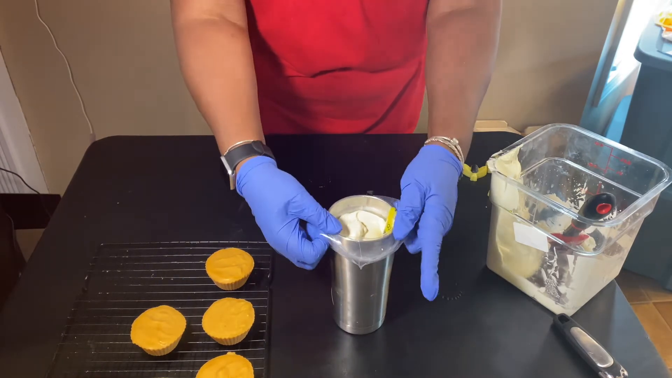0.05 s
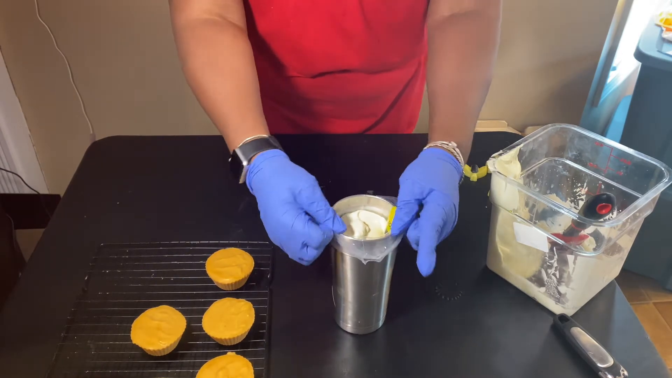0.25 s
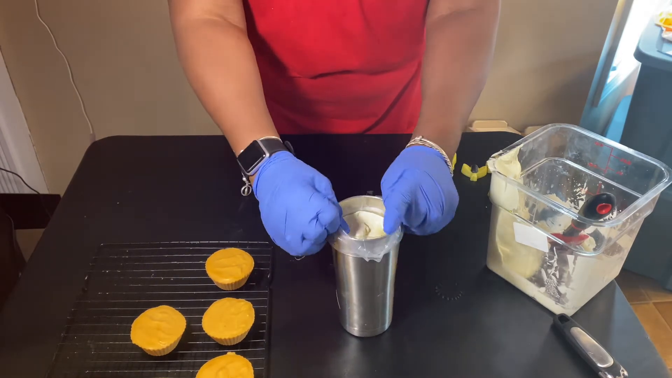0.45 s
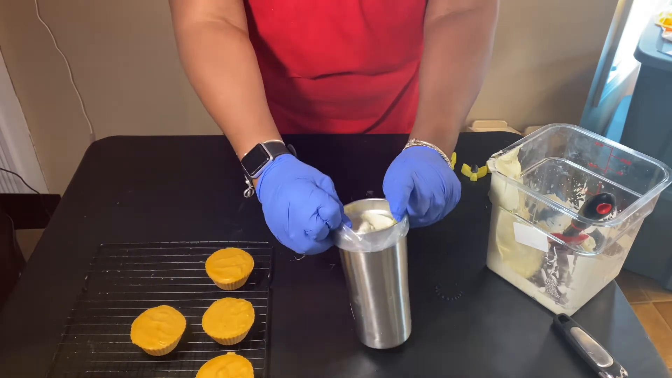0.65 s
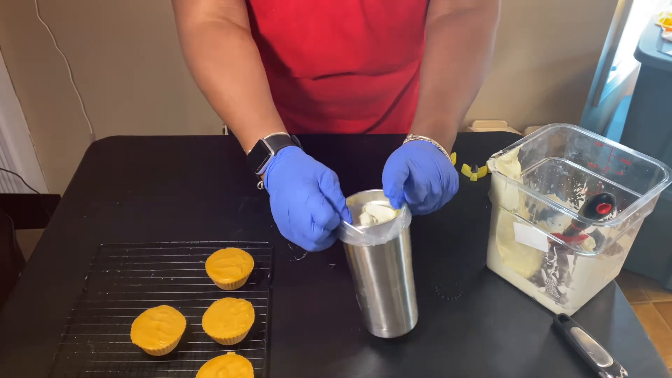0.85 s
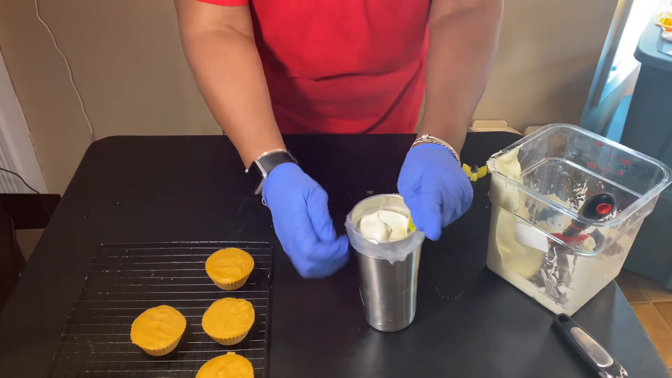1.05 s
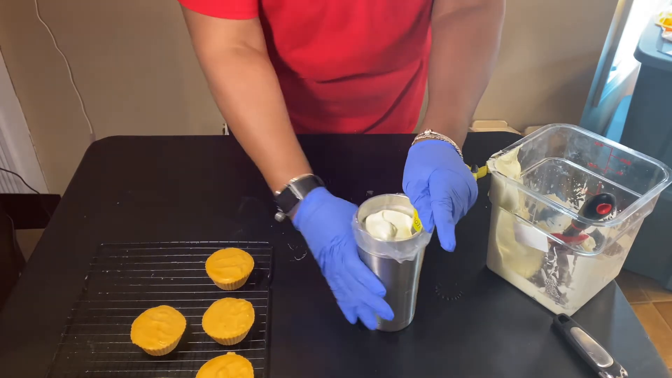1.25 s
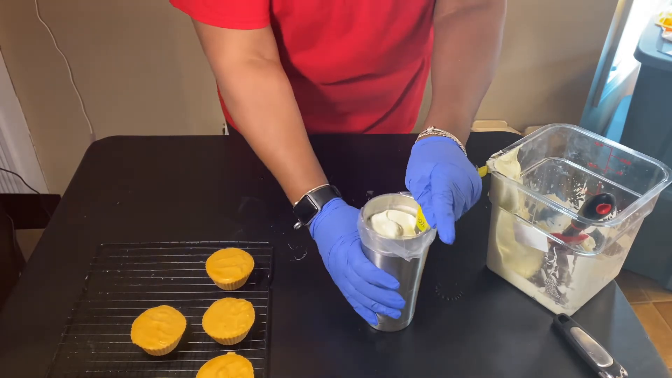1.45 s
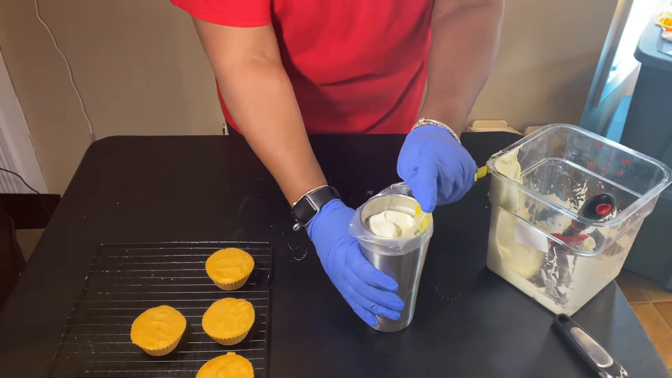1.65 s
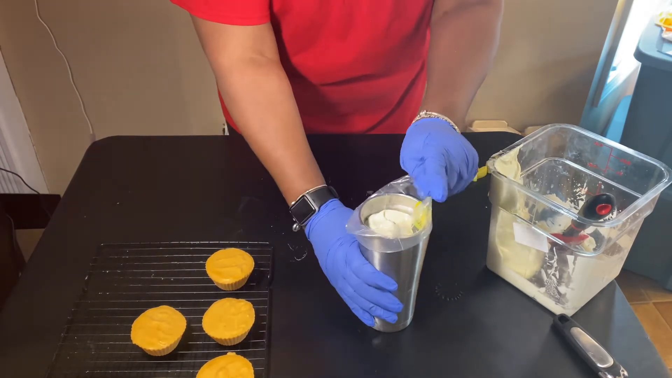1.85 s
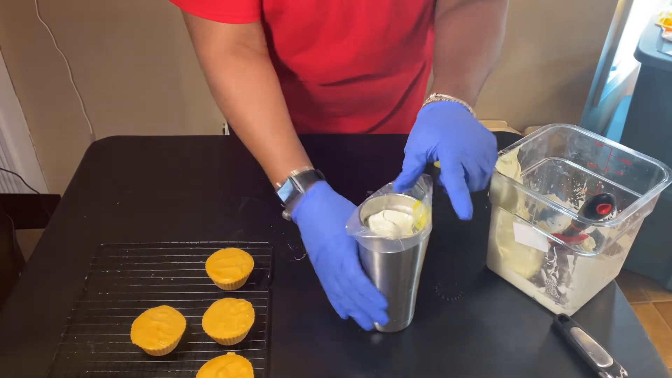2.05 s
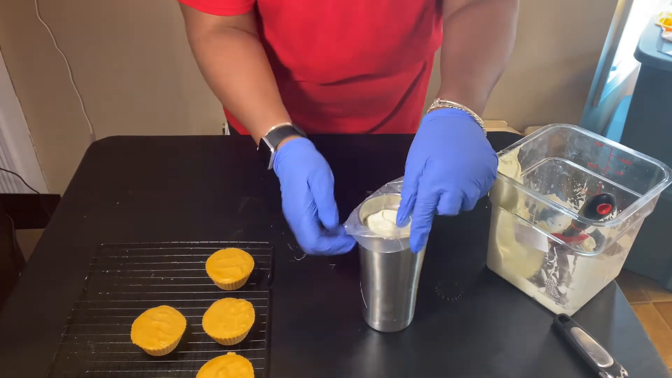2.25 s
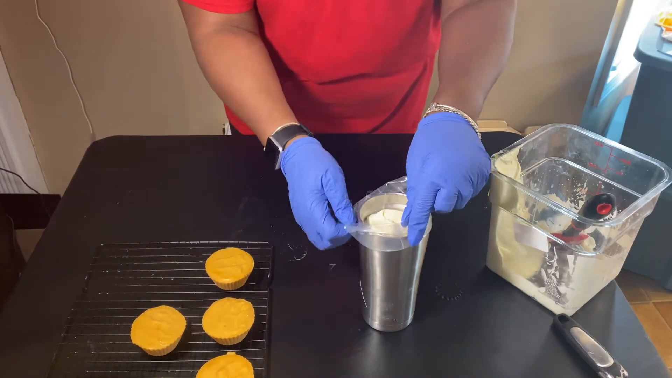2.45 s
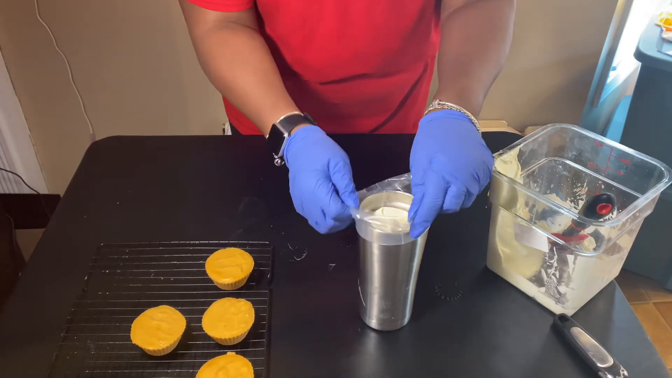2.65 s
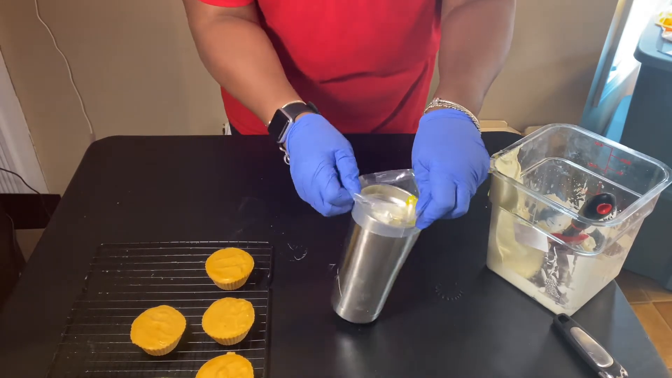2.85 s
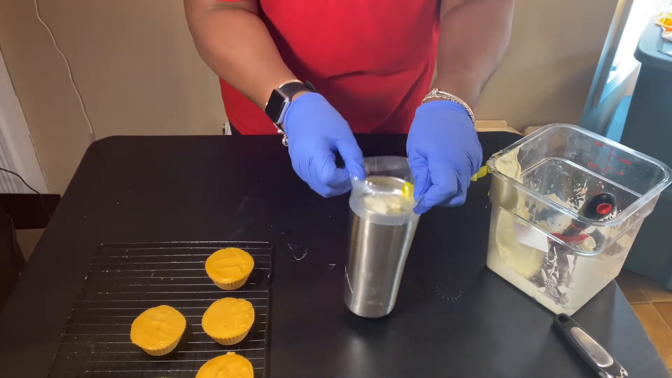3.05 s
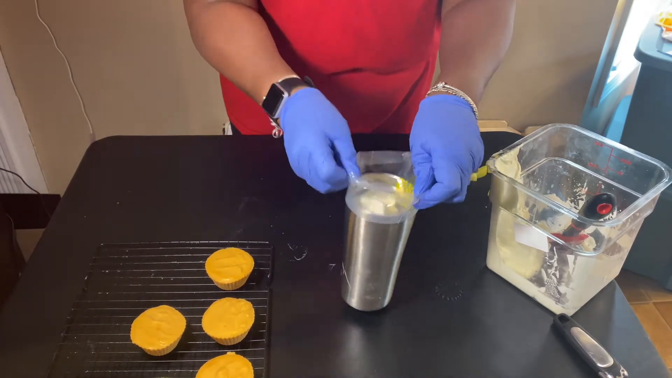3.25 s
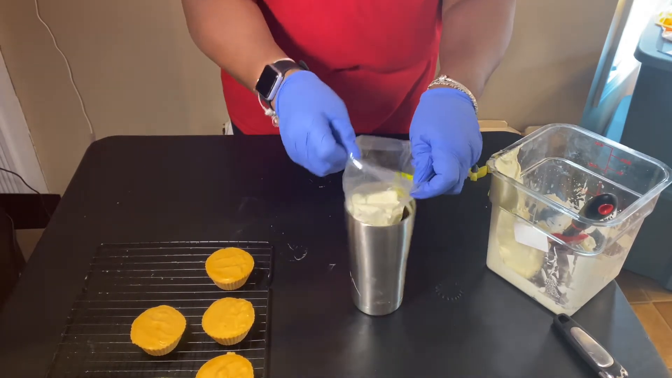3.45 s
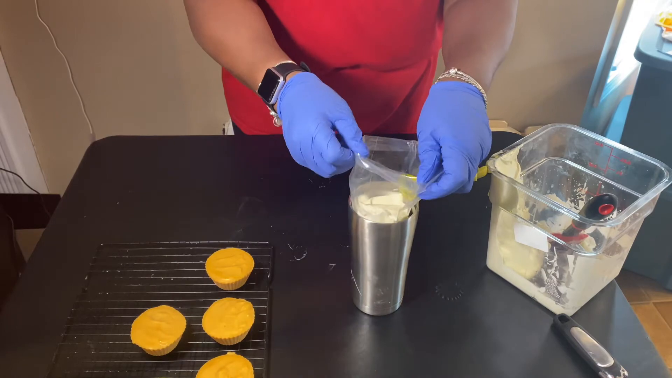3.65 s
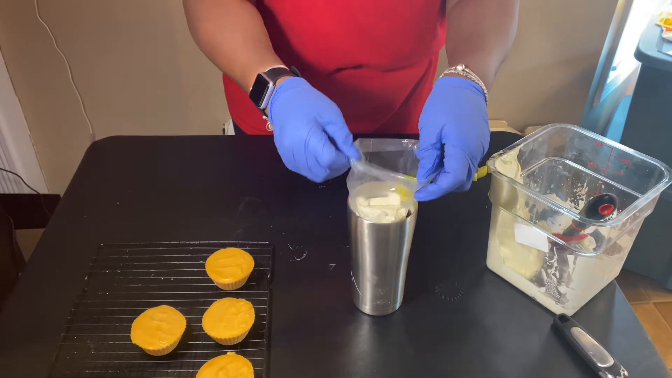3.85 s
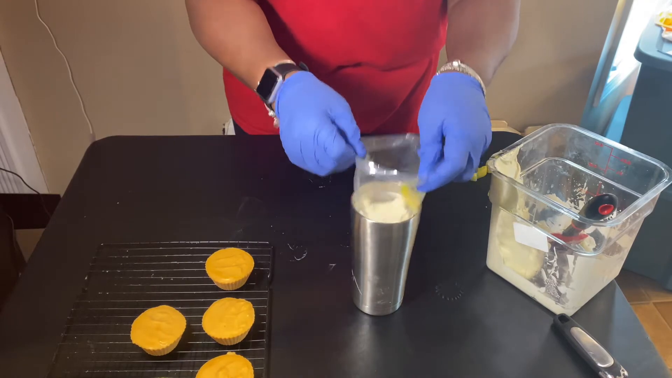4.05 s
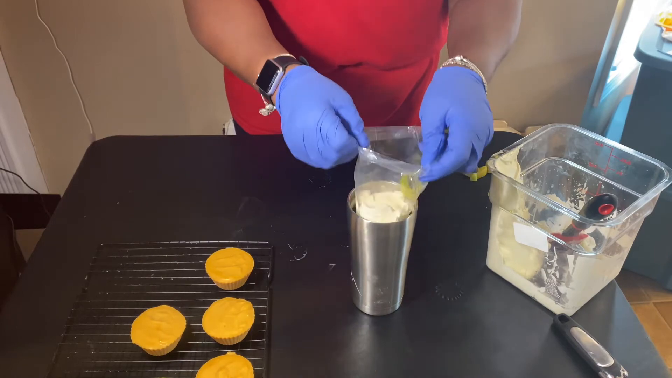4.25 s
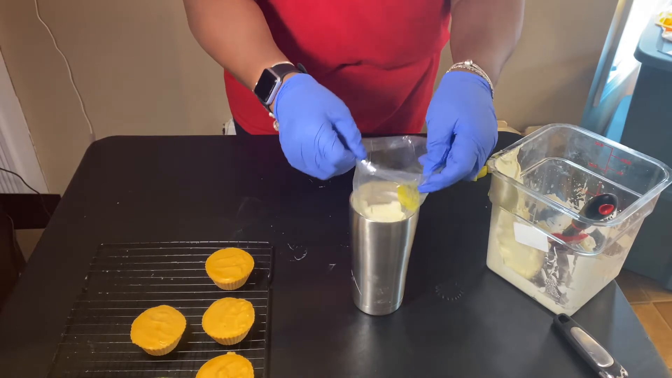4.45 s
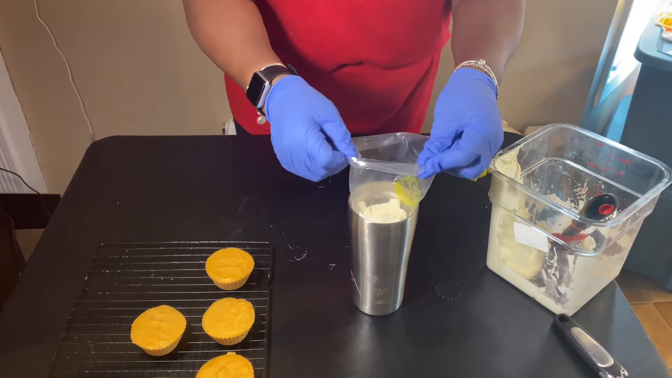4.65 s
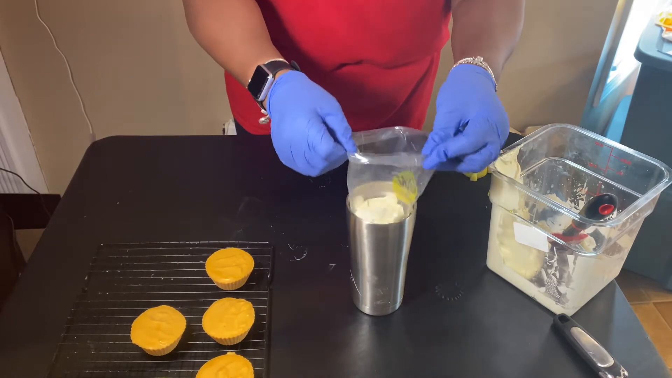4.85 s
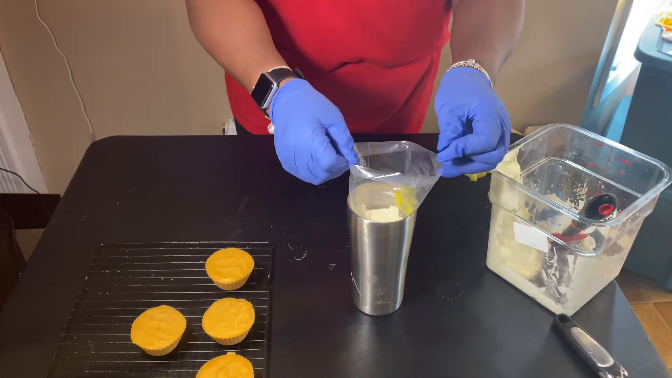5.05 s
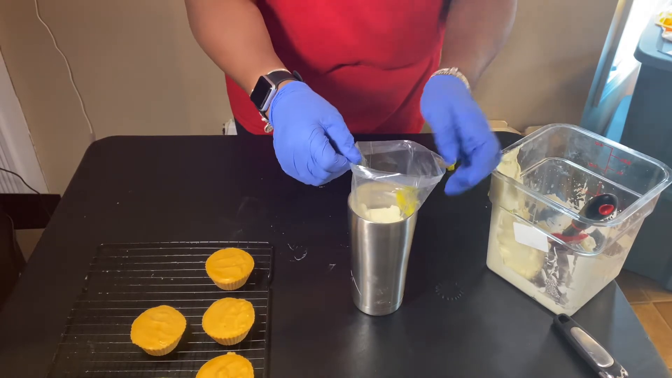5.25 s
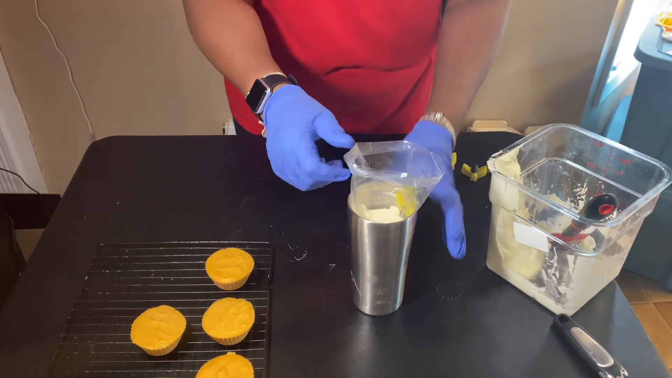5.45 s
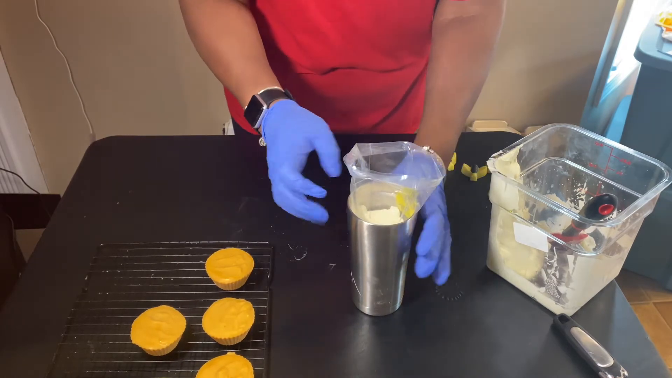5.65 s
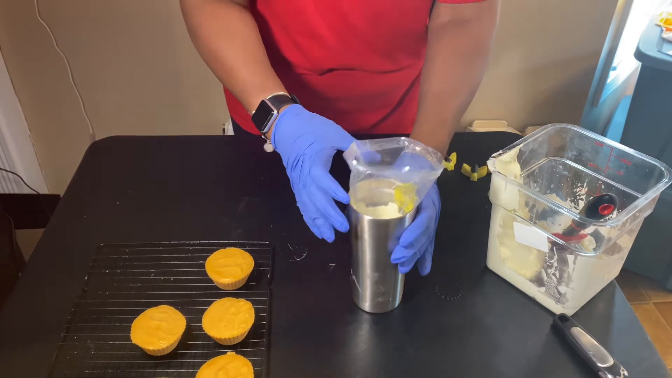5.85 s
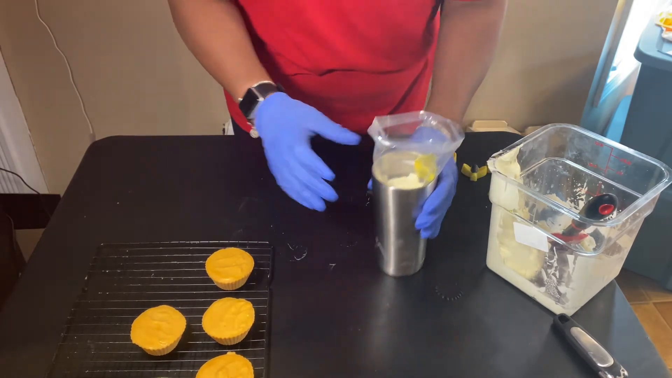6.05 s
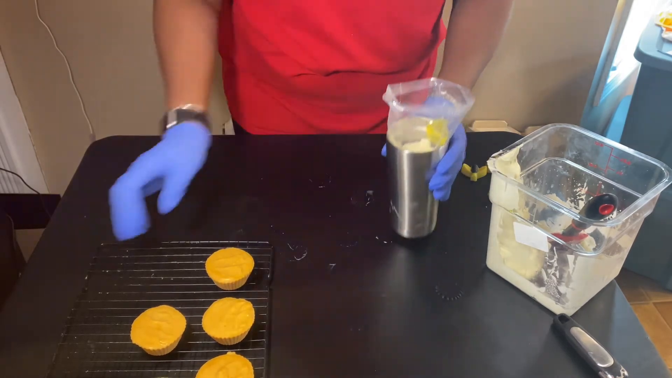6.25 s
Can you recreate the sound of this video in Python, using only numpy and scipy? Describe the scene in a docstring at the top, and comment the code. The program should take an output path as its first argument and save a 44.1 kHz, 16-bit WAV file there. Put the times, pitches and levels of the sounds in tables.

```python
"""A plastic film rustles over a low room drone and hiss, with sharp snaps, as gloved hands work
a cream-filled piping bag loose from the rim of a steel cup; the cup thumps on the table and is slid away.
Film: noise-burst ticks and sagging sine pops. Gloves: shaped noise. Cup and table: decaying modes.
The cup's air resonates with the film; a small room adds a diffuse tail."""
import sys
import numpy as np
from scipy import signal
from scipy.fft import rfft, irfft, next_fast_len
from scipy.io import wavfile
from scipy.ndimage import map_coordinates

SR = 44100
rng = np.random.default_rng(int(sys.argv[2]) if len(sys.argv) > 2 else 0)


def wrap_up_sound(samples):
    """Save the sound to the file named by the first command line argument, as 16-bit audio."""
    columns = np.atleast_2d(samples).T
    # keep every value between -1 and 1, then stretch to whole-number steps
    tamed = np.clip(columns, -1, 1)
    steps = np.round(tamed * 32767).astype(np.int16)
    wavfile.write(sys.argv[1], SR, steps)


N = 278207


def amp(db):
    """Decibels to gain."""
    return 10 ** (np.asarray(db) / 20)


def unit(x):
    """x at rms 1 along its last axis."""
    return x / np.sqrt(np.mean(x ** 2, axis=-1, keepdims=True) + 1e-20)


def along(points, hz):
    """Interpolate (f/Hz, value) points on a log frequency axis."""
    f, value = np.transpose(points)
    return np.interp(np.log(hz + 1), np.log(f + 1), value)


def filtered(x, response):
    """x times a response of frequency."""
    n = x.shape[-1]
    padded = next_fast_len(n + n // 8)
    spectrum = rfft(x, padded) * response(np.fft.rfftfreq(padded, 1 / SR))
    return irfft(spectrum, padded)[..., :n]


def noise(spectrum):
    """Noise of rms 1 with the given colour."""
    white = rng.standard_normal(N)
    return unit(filtered(white, lambda hz: amp(along(spectrum, hz))))


def wobble(rate_hz):
    """A smooth random curve, rate_hz knots a second."""
    knots = rng.standard_normal(int(N * rate_hz / SR) + 4)
    return map_coordinates(knots, [np.arange(N) * rate_hz / SR])


def placed(times_s, sounds):
    """Sum rows of sound, each starting at its time."""
    first = np.round(np.abs(times_s) * SR).astype(int)
    index = first[:, None] + np.arange(sounds.shape[1])
    return np.bincount(index.ravel(), sounds.ravel(), N)[:N]


def gestures(start_s, length_s, db, attack_s, release_db_per_s):
    """Joint gain of hand movements that each rise, hold and die away; overlaps add in power."""
    t = np.arange(N) / SR
    power = np.zeros(N)
    for start, length, level_db in zip(start_s, length_s, db):
        rise = np.clip((t - start) / attack_s, 0, 1)
        since_end = np.clip(t - start - length, 0, 1)
        power += (rise * amp(level_db - release_db_per_s * since_end)) ** 2
    return np.sqrt(power)


# room drone and hiss: f/Hz, relative level/dB per Hz
DRONE_SPECTRUM = [(20, -31), (40, -21.5), (58, 5.5), (80, -11), (120, -8.5), (170, -18), (270, -17.5),
                  (450, -29), (1000, -39), (3000, -49), (15000, -50)]


def drone(db):
    """Steady background noise, strongest in the bass."""
    return amp(db) * noise(DRONE_SPECTRUM)


# film tick colour: f/Hz, relative level/dB
FILM_COLOUR = [(200, 16), (1000, 5), (2000, 5.5), (4000, -0.5), (6500, 0.5), (8000, 2.5), (10000, 5),
               (14000, 3.5), (16500, -2)]


def ticks(centre_hz, swell_s, octaves, size=360):
    """A crease runs through the film in a millisecond or two: a burst of rms 1 round each centre."""
    chance = rng.random((len(centre_hz), 3))
    u = np.arange(size) / SR / (swell_s * (.65 + .7 * chance[:, :1]))
    envelope = u ** 2 * np.exp(2 - 2 * u) + 0.38 * u * np.exp(-u / 2)
    burst = rng.standard_normal((len(centre_hz), size)) * envelope

    def response(hz):
        offset = np.log2((hz + 1) / centre_hz[:, None])  # octaves
        band = amp(along(FILM_COLOUR, hz)) / (1 + (offset / octaves) ** 2)
        # each facet of film has its own peaks and dips
        ripple = np.sin(2 * np.pi * (offset * (1 + chance[:, 1:2]) + chance[:, 2:]))
        return band * amp(3 * ripple)

    return unit(filtered(burst, response))


def pops(pitch_hz, decay_s, sag, rasp_db, size=900):
    """A freed film panel rings a few cycles, its pitch sagging, amid a dry rasp of its other modes."""
    t = np.arange(size) / SR
    pitch = pitch_hz[:, None]
    life = decay_s * (.5 + rng.random(pitch.shape))
    bend = 1 + sag * (np.exp(-t / 0.0048) - .5)
    phase = 2 * np.pi * pitch * np.cumsum(bend, axis=-1) / SR
    ring = unit(np.sin(phase) * np.exp(-t / life) * (1 - np.exp(-t / 0.0071)))

    def band(hz):
        return 1 / (1 + (np.log2((hz + 1) / (.9 * pitch)) / .85) ** 4)

    rasp = filtered(rng.standard_normal((len(pitch), size)), band)
    rasp = unit(rasp * np.exp(-t / life) * (1 - np.exp(-t / 0.00026)))
    return unit(ring + amp(rasp_db) * rasp)


# pulls on the bag: start t/s, length/s, crackle level/dB, slack panels re crackle/dB
BAG_PULLS = [(.01, 0.22, -66.5, 2), (0.256, 0.17, -55.5, -5), (.45, 0.37, -63, -13), (0.715, 0.33, -69, -6),
             (1.097, 0.76, -73.5, -12), (1.54, 0.089, -49.5, -3.5), (1.661, 0.36, -76, 12),
             (2.28, .10, -58.5, 5.5), (2.419, 0.34, -63.5, 1.5), (2.86, 0.58, -54.5, 5),
             (3.24, 0.14, -41, 4), (3.45, .05, -49, 3.5), (3.52, 0.48, -67.5, 9), (3.853, 0.2, -54, 9),
             (4.016, .19, -51.5, 2.5), (4.24, 0.19, -57, 4), (4.47, 0.21, -60, -2),
             (4.767, 0.047, -52.5, 1.5), (4.87, 0.042, -41.5, -6), (4.95, 0.071, -54, 1),
             (5.113, .3, -80, 1.5)]
# laden folds: f/Hz, relative level/dB per Hz
FOLD_SPECTRUM = [(100, -9), (230, -1), (400, 4.5), (550, -5), (900, -8.5), (2500, -40)]
PULL_ATTACK_S, PULL_RELEASE_DB_PER_S = 0.015, 262
# folds re panels, plus a rise once the bag hangs free of the cup
FOLDS_DB, HANGING_DB, HANG_FROM_S, HANG_RISE_S = -7, 10, 3.71, .5


def rustle(tick_count=750, pop_count=420):
    """Pulls gate the crackle of tiny creases, the flutter of panels and the flap of laden folds."""
    start_s, length_s, db, slack_db = np.transpose(BAG_PULLS)
    creasing = gestures(start_s, length_s, db, PULL_ATTACK_S, PULL_RELEASE_DB_PER_S)
    flapping = gestures(start_s, length_s, db + slack_db, PULL_ATTACK_S, PULL_RELEASE_DB_PER_S)

    tick_hz = 4000 * np.exp(.5 * rng.standard_normal(tick_count))
    fine = ticks(tick_hz, swell_s=0.00055, octaves=0.76)
    fine = fine * amp(20 * rng.random((tick_count, 1)) ** 3)
    crackle = unit(placed(rng.random(tick_count) * N / SR, fine))

    panel_hz = 1150 * np.exp(.2 * rng.standard_normal(pop_count))
    panels = pops(panel_hz, decay_s=0.0043, sag=0.085, rasp_db=7.0)
    panels = panels * amp(12 * rng.random((pop_count, 1)) ** 2)
    flutter = unit(placed(rng.random(pop_count) * N / SR, panels))

    hanging = np.clip((np.arange(N) / SR - HANG_FROM_S) / HANG_RISE_S, 0, 1)
    folds = unit(noise(FOLD_SPECTRUM) * amp(4 * wobble(70)))
    folds = amp(FOLDS_DB + HANGING_DB * hanging) * folds
    return creasing * crackle + flapping * (flutter + folds)


# air trapped in cup and bag: f/Hz, bandwidth/Hz, level re direct/dB
CAVITY_MODES = [(358, 30, -10.5), (1202, 72, -4), (2450, 260, -10.5)]


def cup(x):
    """Air in the cup's mouth rings along with the film: resonant bands added to x."""
    def ring(f):
        return sum(amp(db) * 1j * f * width / (hz ** 2 - f * f + 1j * f * width)
                   for hz, width, db in CAVITY_MODES)

    return x + filtered(x, ring)


# gloves and cup sliding: start t/s, length/s, level/dB
SLIDE_STROKES = [(.01, 0.75, -63.5), (0.575, 0.1, -56), (0.947, 0.14, -62), (1.1, .17, -71.5),
                 (1.314, 0.11, -60), (1.504, 0.38, -73), (1.949, 0.045, -54.5), (2.03, 3.3, -71.5),
                 (5.66, .22, -72.5), (5.88, 0.024, -63.5), (5.95, 0.14, -59.5)]
# rubbing hiss: f/Hz, relative level/dB per Hz
RUB_SPECTRUM = [(300, -27.5), (1000, -5), (2000, 0.5), (4200, 3.5), (7000, 0.5), (10000, 4.5), (14500, 1),
                (16500, -10.5)]
STROKE_ATTACK_S, STROKE_RELEASE_DB_PER_S = 0.02, 213


def slide():
    """Soft hiss of gloves and steel sliding, uneven with the pressure and the grain of the surfaces."""
    stroke = gestures(*np.transpose(SLIDE_STROKES), STROKE_ATTACK_S, STROKE_RELEASE_DB_PER_S)
    unevenness_db = 1.1 * wobble(43) + 1.2 * wobble(400)
    return stroke * amp(unevenness_db) * noise(RUB_SPECTRUM)


# room decay: f/Hz, t60/s
ROOM_DECAY = [(60, 0.55), (300, 0.51), (1200, 0.3), (5000, 0.42), (15000, 0.15)]


def room(x):
    """A diffuse noise tail, 1/300 s late, in which each frequency dies at its own speed."""
    hz, t, z = signal.stft(rng.standard_normal(SR // 2), SR, nperseg=256)
    fade = amp(-60 * t / along(ROOM_DECAY, hz)[:, None])
    tail = signal.istft(z * fade, SR, nperseg=256)[1]
    tail = np.pad(tail / np.linalg.norm(tail), (SR // 300, 0))
    return signal.fftconvolve(x, tail)[:N]


# touches that set the cup ringing: t/s, level/dB
CUP_TOUCHES = [(0.065, -74), (0.701, -68), (3.546, -61)]
# steel cup wall modes: f/Hz, relative level/dB, t60/s
STEEL_MODES = [(1090, 1.5, 1), (1857, -8, 0.4), (2724, 1, 0.43), (3440, 4, 0.26), (4404, -9.5, 0.32)]


def steel():
    """Each touch rings the cup's wall faintly, with a new balance of modes."""
    t = np.arange(SR) / SR
    s, touch_db = np.transpose(CUP_TOUCHES)
    hz, db, t60 = np.transpose(STEEL_MODES)[:, :, None]
    modes = amp(db - 60 * t / t60) * np.sin(2 * np.pi * hz * t)
    balance_db = 2.0 * rng.standard_normal((len(s), len(STEEL_MODES)))
    return placed(s, amp(touch_db[:, None] + balance_db) @ modes)


# large creases that buckle: t/s, tick level/dB, pop level/dB, pop f/Hz, tick centre f/Hz
CREASE_SNAPS = [(0.068, -37.5, -50.5, 1890, 6100), (0.1157, -44.5, -54.5, 710, 3800),
                (0.2673, -38, -62.5, 1140, 3600), (0.2916, -38, -78, 1490, 5500),
                (0.3224, -36, -47.5, 650, 3900), (0.347, -38.5, -69, 1190, 5000),
                (0.4429, -34, -65, 1370, 5700), (0.4628, -36, -50, 1095, 4700),
                (0.4978, -36, -57, 670, 5000), (0.6304, -45, -46, 690, 4700),
                (0.839, -44, -51.5, 1100, 3100), (1.327, -58.5, -57, 1440, 4200),
                (1.48, -51, -51, 1400, 2700), (1.4847, -37.5, -46.5, 1410, 4800),
                (1.516, -42, -66, 1270, 5300), (1.5422, -41, -46.5, 600, 4400),
                (1.573, -33.5, -52, 1350, 8000), (1.5967, -31, -45, 1390, 4500),
                (1.6192, -35, -37, 1344, 5500), (1.7802, -45.5, -74, 1510, 7100),
                (1.799, -52.5, -48.5, 1176, 2400), (1.907, -48.5, -50, 1180, 2200),
                (2.0602, -56, -60, 1180, 3400), (2.267, -52, -53.5, 1170, 3100),
                (2.3153, -42, -48, 580, 2400), (2.3335, -43.5, -56.5, 1230, 2200),
                (2.4306, -46, -48.5, 1200, 2300), (2.4457, -30.5, -42, 1136, 6400),
                (2.4545, -34.5, -43.5, 1230, 4000), (2.5001, -44, -42.5, 1140, 2700),
                (2.5349, -37, -43, 794, 4200), (2.6109, -43.5, -47.5, 620, 4700),
                (2.647, -43.5, -44, 630, 4600), (2.669, -41.5, -46.5, 1140, 4300),
                (2.8023, -56.5, -52, 1270, 3200), (2.856, -41, -35.5, 713, 3200),
                (2.8922, -44.5, -46.5, 1230, 2900), (2.9035, -49, -43.5, 650, 2900),
                (2.9305, -41, -48.5, 610, 3700), (2.9788, -34.5, -45.5, 1150, 5900),
                (2.9865, -38, -40.5, 680, 2200), (3.003, -35, -61, 1190, 5500),
                (3.036, -40.5, -46, 1095, 3500), (3.041, -35.5, -38.5, 790, 5900),
                (3.0651, -51, -42.5, 1170, 3200), (3.1461, -34.5, -42.5, 1770, 4500),
                (3.1542, -36.5, -44, 1260, 2800), (3.2367, -37.5, -41.5, 990, 6300),
                (3.2402, -31, -40.5, 1000, 4400), (3.2737, -33.5, -39.5, 1190, 5500),
                (3.3, -31.5, -40.5, 1250, 3600), (3.3126, -28, -28, 1216, 3100),
                (3.318, -31.5, -39.5, 1080, 4800), (3.3658, -29.5, -39, 1170, 3800),
                (3.4293, -30.5, -34.5, 1320, 4000), (3.4833, -36, -45, 903, 3700),
                (3.7073, -39, -47, 1090, 4200), (3.7142, -36.5, -41.5, 977, 3800),
                (3.8471, -48.5, -47.5, 760, 3200), (3.8846, -40, -48, 860, 5900),
                (3.9096, -40.5, -42, 1145, 3400), (3.9797, -40.5, -53, 1260, 3900),
                (4.0296, -43.5, -38.5, 1200, 2900), (4.045, -31, -36, 1190, 4200),
                (4.0951, -41, -36.5, 920, 3500), (4.1271, -33, -59.5, 980, 5300),
                (4.1563, -27, -45.5, 1460, 4800), (4.1719, -30, -35, 1144, 5100),
                (4.1846, -37.5, -38, 537, 3300), (4.2531, -51.5, -43.5, 1126, 2900),
                (4.272, -39.5, -60, 615, 4500), (4.2952, -31, -53.5, 1150, 5900),
                (4.3241, -42.5, -43, 1220, 4200), (4.3333, -42.5, -40, 1180, 4500),
                (4.4265, -38.5, -55.5, 1080, 4600), (4.462, -47.5, -46.5, 1220, 2700),
                (4.5137, -40.5, -44, 1150, 4800), (4.603, -35.5, -43.5, 1068, 5200),
                (4.669, -43.5, -61.5, 1300, 4600), (4.7221, -54, -47.5, 816, 3500),
                (4.7483, -33, -49.5, 1170, 5100), (4.8027, -44.5, -47.5, 1120, 4300),
                (4.8087, -51, -40.5, 1177, 2900), (4.8767, -44.5, -47.5, 1290, 2200),
                (4.8914, -32.5, -46, 1200, 5200), (4.9226, -47.5, -36.5, 1100, 3800),
                (5.042, -61.5, -45.5, 1133, 4200), (5.1337, -54, -51, 1174, 4000),
                (5.3712, -48, -57.5, 1120, 5600), (5.4382, -72, -47.5, 1067, 3000)]


def snaps():
    """Each large crease ticks as it buckles and pops as its panel is freed."""
    s, tick_db, pop_db, pop_hz, tick_hz = np.transpose(CREASE_SNAPS)
    tick = ticks(tick_hz, swell_s=0.00098, octaves=0.81) * amp(tick_db)[:, None]
    pop = pops(pop_hz, decay_s=0.0024, sag=0.12, rasp_db=-1) * amp(pop_db)[:, None]
    return placed(s - .0007, tick) + placed(s - .0002, pop)


# time scatter; levels re the large crease's pop; median tick centre
FLURRY_S, FLURRY_TICK_DB, FLURRY_POP_DB, FLURRY_HZ = .007, -13, -12, 3600


def flurries(count=3):
    """A panel giving way drags smaller creases with it: ticks and pops scattered round each snap."""
    s, _, pop_db, pop_hz, _ = np.repeat(CREASE_SNAPS, count, axis=0).T
    when, strength, tick_pitch, pop_pitch = rng.standard_normal((len(s), 4)).T
    s = s + FLURRY_S * (when + .6)
    gain = amp(pop_db + 2 * strength)[:, None]
    tick = ticks(FLURRY_HZ * np.exp(.3 * tick_pitch), swell_s=0.001, octaves=1.0)
    pop = pops(pop_hz * np.exp(.25 * pop_pitch - .1), decay_s=0.0025, sag=0.36, rasp_db=3.5)
    return placed(s, tick * gain * amp(FLURRY_TICK_DB)) + placed(s, pop * gain * amp(FLURRY_POP_DB))


# cup meets table: t/s, table ring level/dB, slap level/dB
CUP_THUMPS = [(0.971, -37, -71), (3.355, -9.5, -10.5)]
# table top modes: f/Hz, relative level/dB, t60/s
TABLE_MODES = [(61.7, 5, 0.2), (103.3, -8, .15), (120.3, -2.5, 0.14), (178.2, -17, 0.19),
               (199, -15.5, 0.187), (244, -19.5, 0.23), (355, -27.5, 0.11)]
# impact noise: f/Hz, relative level/dB per Hz
BOOM_SPECTRUM = [(20, -11.5), (50, -13), (100, -6.5), (210, -5), (330, -6), (600, -8), (1500, -32)]


def thumps():
    """The full cup lands: bending waves arrive treble first, then the table's low modes build and ring."""
    t = np.arange(SR) / SR
    s, ring_db, slap_db = np.transpose(CUP_THUMPS)
    slap_hz = 105 + 520 * np.exp(-t / .004)
    slap_envelope = (t / 0.0055) ** 2 * np.exp(2 - 2 * t / 0.0057)
    slap = np.sin(2 * np.pi * np.cumsum(slap_hz) / SR) * slap_envelope
    boom = amp(-14.5 - 60 * t / 0.33) * noise(BOOM_SPECTRUM)[:SR] * (1 - np.exp(-t / 0.0027))
    ring = np.zeros(SR)
    for hz, db, t60 in TABLE_MODES:
        swell = (1 - np.exp(-t * hz / 0.99)) ** 2
        ring += amp(db - 60 * t / t60) * swell * np.sin(2 * np.pi * hz * t)
    return placed(s, amp(ring_db)[:, None] * ring + amp(slap_db)[:, None] * (slap + boom))


# laden bag flops against the cup: t/s, level/dB, f/Hz
BAG_FLOPS = [(1.545, -60, 304), (2.317, -57.5, 378), (3.147, -42.5, 208), (3.212, -46.5, 230),
             (3.296, -43, 260), (3.546, -53, 302), (4.05, -43.5, 330), (4.186, -44, 401),
             (4.336, -47.5, 327), (5.044, -50.5, 373)]


def flops():
    """Cream-weighted film answers with a low, quickly damped pop."""
    s, db, pitch_hz = np.transpose(BAG_FLOPS)
    pop = pops(pitch_hz, decay_s=0.0079, sag=0.73, rasp_db=4.0, size=2200)
    return placed(s, pop * amp(db)[:, None])


# glove drags on steel: start t/s, length/s, level/dB, centre f/Hz
GLOVE_SQUEAKS = [(1.974, 0.034, -54.5, 3230), (5.645, .23, -71, 4040)]
SQUEAK_OCTAVES, SQUEAK_RISE_SHARE, SQUEAK_RELEASE_DB_PER_S = 0.44, .35, 700


def squeaks():
    """Rubber sticks and slips: a rough, narrow band of noise."""
    out = np.zeros(N)
    for start_s, length_s, db, centre_hz in GLOVE_SQUEAKS:
        def band(hz):
            return 1 / (1 + (np.log2((hz + 1) / centre_hz) / SQUEAK_OCTAVES) ** 2)

        chatter = unit(filtered(rng.standard_normal(N), band) * amp(1.7 * wobble(150)))
        attack_s = SQUEAK_RISE_SHARE * length_s
        out += chatter * gestures([start_s], [length_s], [db], attack_s, SQUEAK_RELEASE_DB_PER_S)
    return out


# side signal response: f/Hz, level/dB
SIDE_WIDTH = [(50, -25.5), (130, -17.5), (300, -12), (1200, -8), (3500, -6.5), (7000, -6), (12000, -16.5),
              (15000, -17.5)]


def scene():
    """The work is straight ahead; room echoes and background drone spread to the sides."""
    film = snaps() + flurries() + flops() + rustle()
    bag = cup(film) + slide() + squeaks() + steel()
    thump = thumps()
    mid = bag + amp(-12) * room(bag) + thump + amp(-19) * room(thump) + drone(-58.0)
    spread = amp(-3.5) * room(bag) + amp(-8.0) * room(thump) + drone(-52.5)
    side = filtered(spread, lambda hz: amp(along(SIDE_WIDTH, hz)))
    return np.array([mid + side, mid - side])


# phase lead of left over right: f/Hz, phase/rad
STEREO_PHASE = [(20, 0), (1500, 0), (3200, .45), (4500, .3), (5600, .9), (6500, 0), (8500, -3.1),
                (10100, -6.3), (12000, -9.4), (14000, -12.6), (16000, -15.7)]
TOP_HZ = 16500


def record(dry):
    """Phone stereo processing: left and right drift apart in phase in the treble, and the band limit."""
    half_lead = np.array([[.5], [-.5]])  # left, right
    return filtered(dry, lambda hz: np.exp(1j * along(STEREO_PHASE, hz) * half_lead) * (hz < TOP_HZ))


dry = scene()
out = record(dry)
wrap_up_sound(out)
```